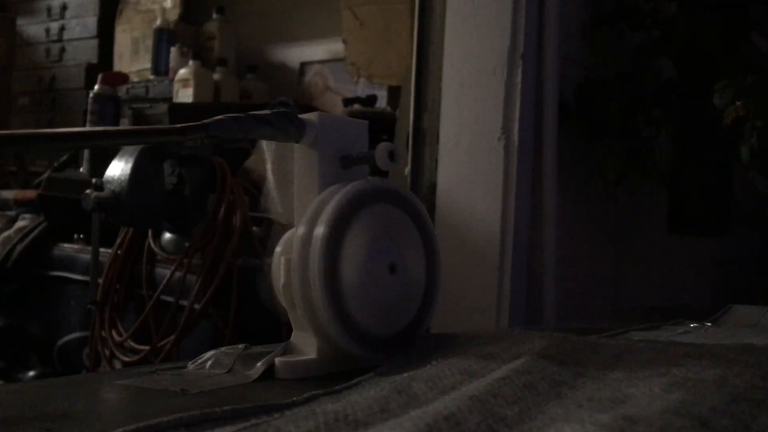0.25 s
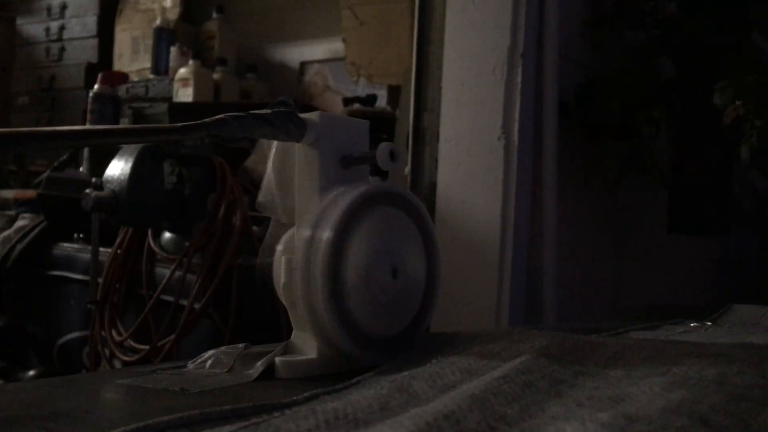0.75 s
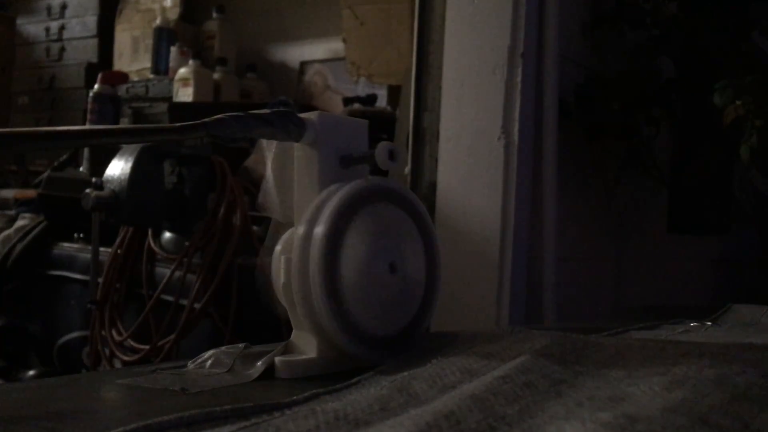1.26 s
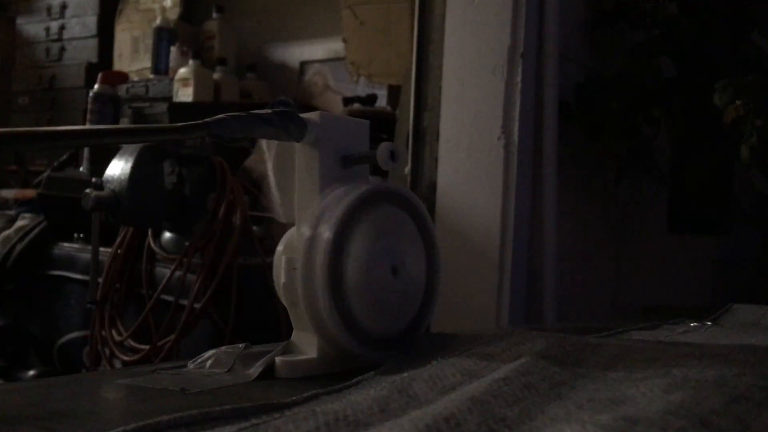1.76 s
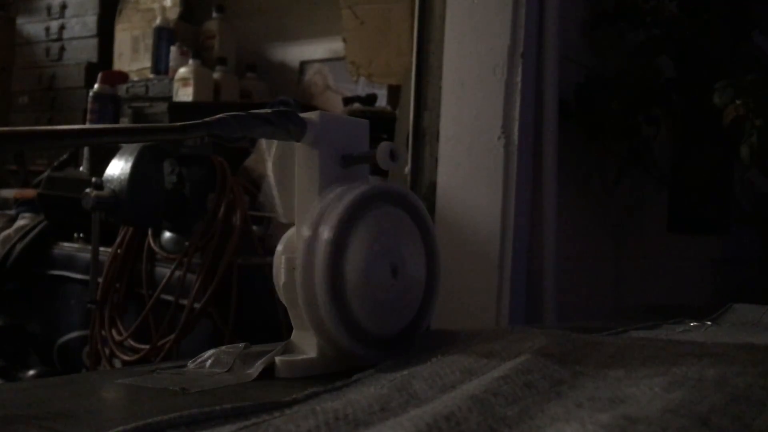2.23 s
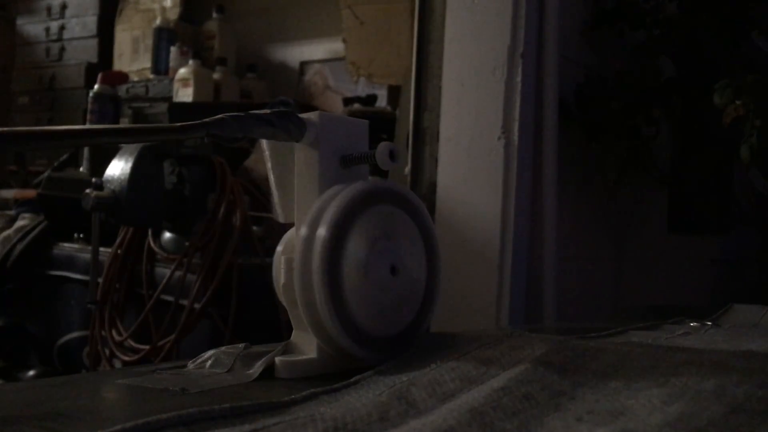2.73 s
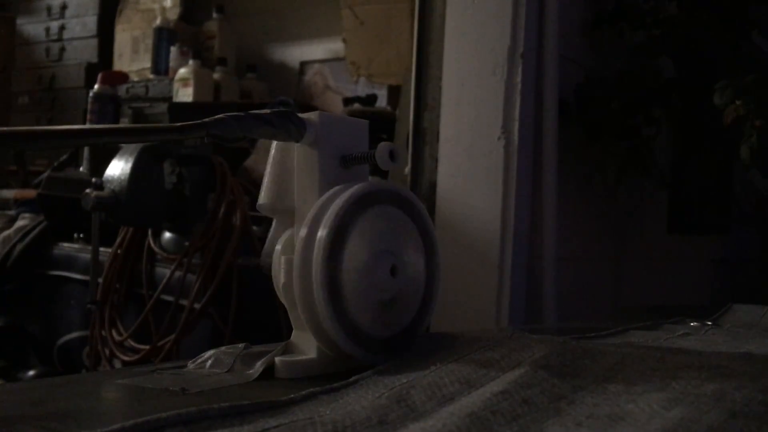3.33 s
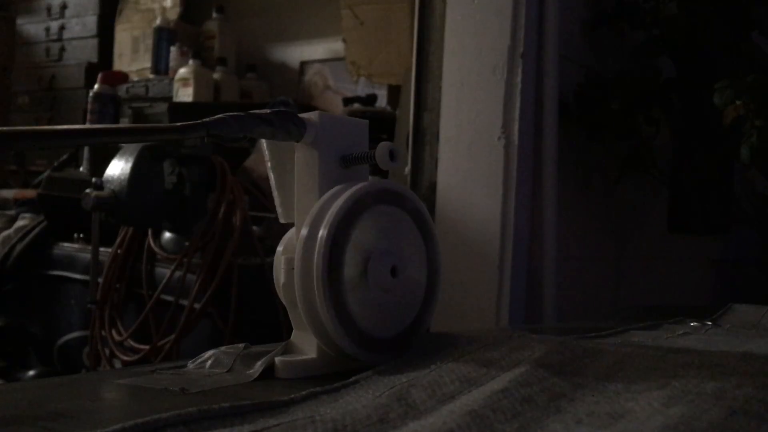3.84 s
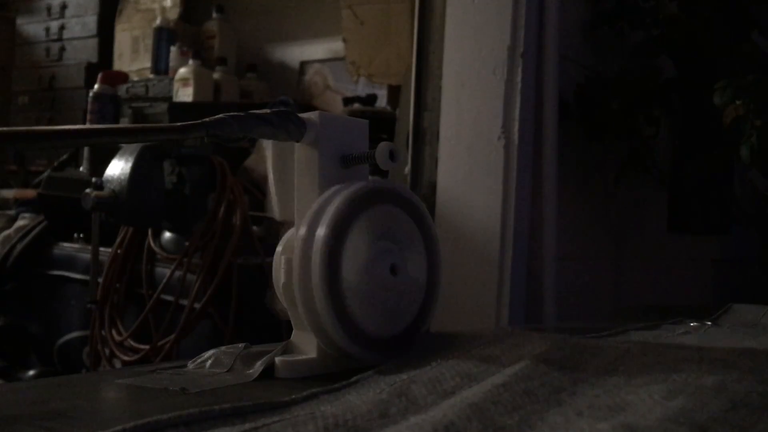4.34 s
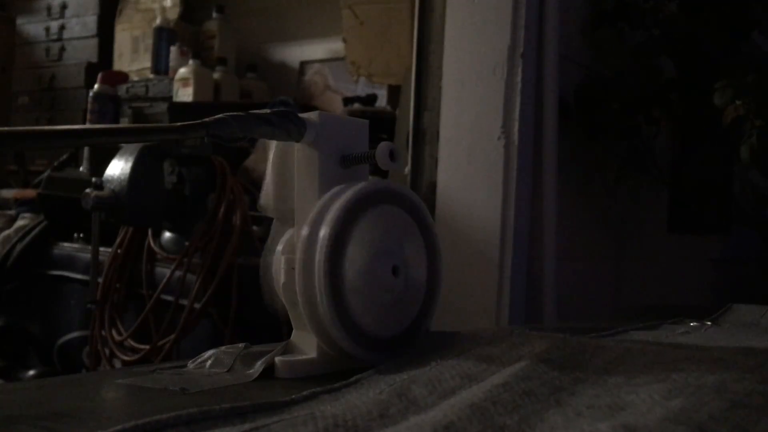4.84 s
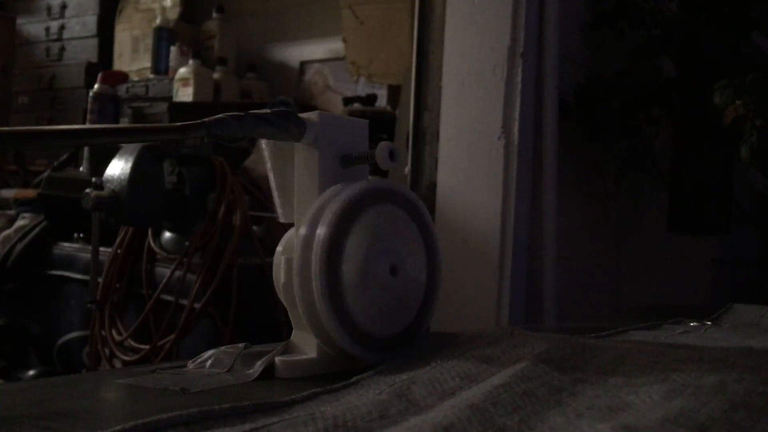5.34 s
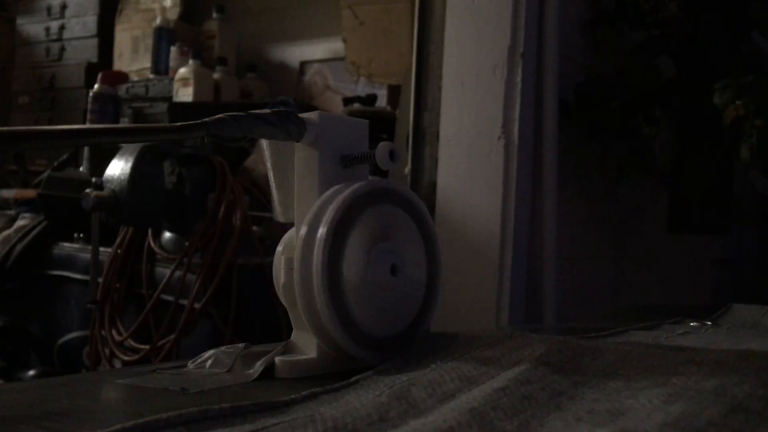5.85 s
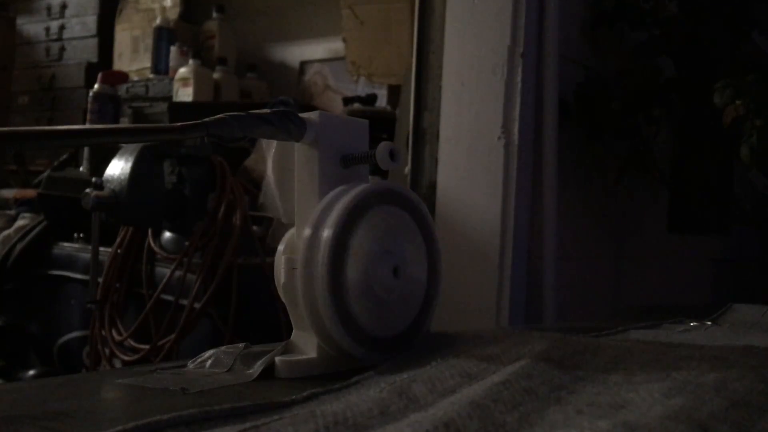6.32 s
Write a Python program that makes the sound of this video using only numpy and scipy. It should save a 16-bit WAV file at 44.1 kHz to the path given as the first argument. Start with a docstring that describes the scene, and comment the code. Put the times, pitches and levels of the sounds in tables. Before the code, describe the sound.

Close by on a workbench, a little air-driven engine puffs fast over the constant hiss of a leak, with faint plastic rubbing and a low boom from the bench. After a couple of seconds the hiss drops and the engine winds down, letting out short squeaky spits. The hiss comes back with strong, separate chuffs and ticking joints, and the pace rises, sags and rises again.

```python
"""A small plastic piston engine runs on compressed air on a workbench.
Every turn lets out a puff of exhaust over the hiss of leaking air and squeezes air past the piston.
Plastic parts rub, and loose joints tick in the frame and knock on the bench, which booms.
The air is throttled and the flywheel coasts down with a few sharp spits; then the valve is opened
again and the engine chuffs on at a slower, wandering pace."""
import sys
import numpy as np
from scipy import signal
from scipy.fft import rfft, irfft
from scipy.io import wavfile
from scipy.ndimage import uniform_filter1d

SR = 44100
rng = np.random.default_rng(int(sys.argv[2]) if len(sys.argv) > 2 else 0)


def int16_out(signal):
    """Quantize to a 16-bit WAV file."""
    q = np.round(np.clip(np.atleast_2d(signal).T, -1, 1) * 32767)
    wavfile.write(sys.argv[1], SR, q.astype(np.int16))


N = 290178
T = np.arange(N) / SR
HZ = np.fft.rfftfreq(N, 1 / SR)

# how fast the flywheel spins: t/s, speed/(turns a second)
FLYWHEEL_SPEED = [(0.0, 20.257), (0.782, 21.137), (2.23, 21.341), (2.48, 20.051), (3.11, 10.274),
                  (3.651, 6.241), (3.938, 6.445), (4.546, 11.972), (4.932, 13.662), (5.502, 12.365),
                  (5.985, 9.942), (6.2, 12.595), (6.58, 16.165)]
# the air supply is throttled, reopened, eased back and opened again: t/s, level/dB
AIR_SUPPLY = [(0, -21.5), (2.3, -22), (2.65, -29), (3.03, -31), (3.2, -23.5), (3.45, -23.3), (3.9, -19),
              (4.3, -20.5), (4.6, -20.5), (5.1, -23), (5.35, -22.5), (5.8, -25), (5.99, -20), (6.58, -21)]
# how the bench's deep boom swells and sinks: t/s, level/dB
BOOM_LEVEL = [(0, -26), (.4, -30), (2.55, -33), (2.95, -30.5), (3.3, -34), (3.8, -36), (4.3, -32.5),
              (4.6, -30.5), (5.4, -31.5), (5.95, -38.5), (6.1, -29), (6.58, -28)]

# tone colours, or how strong each pitch is within one noise: f/Hz, level/dB
LEAK_COLOUR = [(350, -55), (600, -15), (1310, -7.5), (2700, -15.5), (3010, -16), (5560, -11.5), (6290, -6),
               (10300, -3.5), (14100, 2), (15700, 0)]  # leaking air
EXHAUST_COLOUR = [(1500, -47), (2500, -19.5), (3300, -31.5), (4400, -21), (5300, -8), (6900, -1.5),
                  (10700, 1), (14700, -1), (15700, 1)]  # a puff of exhaust
RUB_COLOUR = [(150, -8), (300, -4), (520, -6.5), (800, -8.5), (1400, -4), (1900, -2.5), (2600, -11.5),
              (3500, -15.5), (5000, -13), (9000, -26.5)]  # plastic on plastic
SCRAPE_COLOUR = [(300, -17), (460, 7), (530, -4), (620, -1), (950, 1), (1500, 0.5), (2000, -10),
                 (2700, -26), (5000, -30)]  # the piston at speed
SQUEEZE_COLOUR = [(1500, -21), (3000, -3.5), (4400, -6), (5100, 0), (6000, 8), (9500, 1.5), (10600, 6.5),
                  (12000, -4), (15700, 0)]  # air forced past the piston
RUMBLE_COLOUR = [(20, -55), (45, -16), (65, -9.5), (85, -0.5), (97, -3), (104, 5.5), (116, -7.5),
                 (150, -7.5), (205, -6), (235, -15.5), (305, -12), (400, -14.5), (500, -25), (700, -18),
                 (1000, -41)]  # the bench
TICK_COLOUR = [(200, -28), (500, 3), (1300, 4), (2200, -9), (3300, 4.5), (5000, -11), (9000, 6.5),
               (15000, -31)]  # the frame
CHUFF_COLOUR = [(600, -31), (1500, -19), (2600, -5.5), (3300, -13.5), (4400, -1.5), (5200, -2.5), (7200, 4),
                (9500, -19), (12000, 4), (15700, -4.5)]  # the first blast of a puff

# pitches that the cylinder and its openings boost or weaken: f/Hz, width/Hz, level/dB
PORT_RESONANCES = [(3330, 520, 5.5), (4400, 500, 5), (6850, 650, 2), (7950, 300, 3.5), (9480, 650, 3),
                   (10420, 600, -4), (11600, 700, 1.5)]
# where in each turn the parts slide: angle/turns, length/turns, level/dB
RUB_STROKES = [(.12, 0.11, -0.5), (.3, 0.14, 1), (.49, 0.099, 2), (.67, 0.12, -0.5)]
# where in each turn air slips past the piston: angle/turns, length/turns,
# fast level/dB, slow level/dB, coasting level/dB, whistle f/Hz, whistle level/dB
SQUEEZE_STROKES = [(.1, 0.11, -19.5, -21, -20, 8230, -8), (.265, 0.077, -21.5, -34, -17, 6910, 4),
                   (.485, 0.064, -16.5, -19.5, -33, 8000, -4), (.603, 0.14, -22, -29.5, -18.5, 7960, -1.5),
                   (.72, 0.18, -20, -20.5, -28, 7810, -14), (.965, 0.054, -17.5, -24.5, -21, 7500, -7)]
# where in each turn the loose crank and valve knock: angle/turns,
# fast thump level/dB, slow thump level/dB, fast tick level/dB, slow tick level/dB
JOINT_KNOCKS = [(.003, 4.5, -8.5, 1, 24), (.075, -76, -11, -26, -2), (.29, -3, -6.5, -14, -17),
                (0.429, 1, -10, -11, 7), (0.501, -28, -3.5, -22, 19), (0.576, -4, -9.5, -7, -12),
                (.655, -2, -4.5, -6, -1), (0.777, -4, 0.5, 1, -9), (0.904, -6, -10, -8, -25)]
# notes at which the bench rings with the engine on it: f/Hz, level/dB, time to fade by 60 dB/s
BENCH_NOTES = [(62, -20, 0.048), (100.1, 10, 0.15), (144, -8, 0.19), (192, -27, 0.11), (253, -48, 0.028),
               (459.4, -3.5, 0.062), (602, -2, 0.072), (676, -3, 0.077)]
# spits of air while coasting: t/s, length/s, level/dB, squeak f/Hz, squeak level/dB
COASTING_SPITS = [(2.745, 0.0033, -20.5, 11300, -2), (2.783, 0.0024, -22, 7940, -5),
                  (2.809, 0.0041, -22, 8050, 7), (2.836, 0.003, -27, 6800, -3),
                  (2.851, .0025, -27, 8100, 2), (2.902, 0.0038, -26, 8050, 2),
                  (2.925, 0.0023, -19, 11100, -6), (2.954, 0.0027, -13, 7840, -1),
                  (2.958, 0.0029, -19, 11240, 5), (3.07, 0.007, -20, 6800, -11),
                  (3.116, 0.004, -20, 8000, -3)]

FULL_SPEED, SLOW_SPEED = 21, 13  # turns a second
USUAL_SUPPLY_DB = -24.5


def amp(db):
    """Turn decibels into a number to multiply by."""
    return 10 ** (np.asarray(db) / 20)


def unit(x):
    """Scale a signal to an average strength (rms) of 1."""
    return x / np.sqrt(np.mean(x ** 2) + 1e-20)


def curve(points):
    """Join (time, value) points with straight lines."""
    return np.interp(T, *np.transpose(points))


def shape(points):
    """Join (Hz, dB) points into a gain for every frequency."""
    hz, db = np.transpose(points)
    return amp(np.interp(np.log(HZ + 1), np.log(hz + 1), db))


def muffle(x, hz, steepness):
    """Turn down everything above a frequency."""
    return irfft(rfft(x) / (1 + (HZ / hz) ** steepness), N)


def colour(x, gain):
    """Give a signal a tone colour, at strength 1."""
    return unit(irfft(rfft(x) * gain, N))


def noise(gain):
    """Random noise with the given tone colour."""
    return colour(rng.standard_normal(N), gain)


def flutter(rate_hz, depth_db):
    """A gain that wanders at random, up to about the given rate."""
    return amp(depth_db * noise(1 / (1 + (HZ / rate_hz) ** 4)))


def levelled(x, samples=8000):
    """Even out a signal to strength 1 over a sliding stretch of samples."""
    return x / np.sqrt(abs(uniform_filter1d(x ** 2, samples)) + 1e-9)


def stroke(turns, angle, length):
    """A smooth swell once a turn, centred on a crank angle."""
    return np.exp(-2 * (((turns - angle + .5) % 1 - .5) / length) ** 2)


def crank(start_turns=-.17):
    """The crank's position in turns, and its pace from 0 (slow) to 1 (full speed)."""
    speed = curve(FLYWHEEL_SPEED)
    pace = np.clip((speed - SLOW_SPEED) / (FULL_SPEED - SLOW_SPEED), 0, 1)
    return start_turns + np.cumsum(speed) / SR, pace


def ports():
    """The tone colour that the cylinder and its openings give to any rush of air."""
    return amp(sum(db * np.exp(-2 * ((HZ - hz) / width) ** 2) for hz, width, db in PORT_RESONANCES))


def leak_and_exhaust(turns, pace, supply_db):
    """Air leaks all the time, and puffs out once a turn through the exhaust port."""
    leak = noise(shape(LEAK_COLOUR) * ports()) * amp(0.67) * (1 - 0.074 * stroke(turns, 0.77, 0.15))
    centre, half_open, edge = .175 - 0.018 * pace, .163, .013  # in turns; opens earlier at speed
    from_centre = (turns - centre + .5) % 1 - .5
    opening = .5 + .5 * np.tanh((half_open - abs(from_centre)) / (2 * edge))
    # the rising piston drives the air out harder toward the end of the puff
    puff = noise(shape(EXHAUST_COLOUR) * ports()) * opening * amp(5.5 + 5.7 * from_centre)
    jets = (leak + puff) * flutter(220, .5)
    # higher pressure makes a brighter jet
    dull = muffle(jets, hz=10000, steepness=8)
    extra_db = supply_db - USUAL_SUPPLY_DB
    return (dull * amp(-.3 * extra_db) + (jets - dull) * amp(0.48 * extra_db)) * amp(supply_db)


def sliding(turns, pace, rattle_db, supply_db):
    """Plastic rubs on plastic with each stroke; at a slow pace, air sounds the hollow cylinder."""
    force = 0.3 + sum(amp(db) * stroke(turns, angle, length) for angle, length, db in RUB_STROKES)
    rub = noise(shape(RUB_COLOUR) * ports()) * unit(force * flutter(430, 2.9)) * amp(rattle_db - 2.5)
    # at speed the piston slaps and scrapes the wall as it turns round
    slap = stroke(turns, .032, .044) + .57 * stroke(turns, .483, .17) + .28 * stroke(turns, .96, .042)
    scrape = noise(shape(SCRAPE_COLOUR)) * slap * pace ** 2 * amp(-31)
    hollow = noise(1 / (1 + ((HZ - 3330) / 190) ** 4))
    return rub + scrape + hollow * unit(force) * (1 - pace) * amp(supply_db - 23.5)


def whistling(hz, db):
    """Air rushes through a narrow gap: a hiss with a whistle in it."""
    hiss = noise(shape(SQUEEZE_COLOUR) * ports())
    return hiss + amp(db) * noise(1 / (1 + ((HZ - hz) / 130) ** 2))


def squeezing(turns, pace, supply_db):
    """The piston pumps air through its own gaps in bursts, whose levels shift as it slows or coasts."""
    coasting = np.clip((-27.5 - supply_db) / 6, 0, 1)
    bursts = np.zeros(N)
    for angle, length, fast_db, slow_db, coast_db, whistle_hz, whistle_db in SQUEEZE_STROKES:
        driven_db = slow_db + pace * (fast_db - slow_db)
        burst_db = driven_db + coasting * (coast_db - driven_db)
        bursts += whistling(whistle_hz, whistle_db) * stroke(turns, angle, length) * amp(burst_db)
    return bursts * flutter(150, 2.44) * amp(-5.5)


def droning(pace):
    """The bench rumbles and hums near its strongest note, most of all when the engine is slow."""
    hz = 103 + 3.47 * noise(1 / (1 + (HZ / 7) ** 4))
    hum = np.sqrt(2) * np.sin(2 * np.pi * np.cumsum(hz) / SR) * flutter(14, 1.5)
    return hum * amp(-1 - 17 * pace ** 2) + noise(shape(RUMBLE_COLOUR)) * amp(-2 - 6 * pace ** 2)


def rocking(turns, pace):
    """The piston's weight, thrown to and fro, rocks the bench twice a turn."""
    return -np.cos(4 * np.pi * turns) * pace ** 2 * amp(-49)


def knocking(turns, pace):
    """Loose joints knock near set crank angles: one spike for each thump and each tick."""
    thumps, ticks = np.zeros(N), np.zeros(N)
    whole_turns = np.arange(int(turns[-1]) + 1)
    for angle, thump_fast_db, thump_slow_db, tick_fast_db, tick_slow_db in JOINT_KNOCKS:
        slip, weight, snap = rng.standard_normal((len(whole_turns), 3)).T
        fast = np.interp(whole_turns + angle, turns, pace)
        # slow turns knock later and less evenly
        late = .02 * (1 - fast) + slip * (.012 - .009 * fast)
        thump_db = thump_slow_db + fast * (thump_fast_db - thump_slow_db) + weight * (3.2 - 2.4 * fast)
        tick_db = tick_slow_db + fast * (tick_fast_db - tick_slow_db) + 3.4 * snap
        at = np.searchsorted(turns, whole_turns + angle + late)
        heard = (at > 0) & (at < N)
        thumps[at[heard]] += amp(thump_db)[heard]
        ticks[at[heard]] += amp(tick_db)[heard]
    return thumps, ticks


def booming(thumps, pace):
    """Each thump rings the bench over its drone; the deep boom swells and sinks, the higher notes less."""
    t = T[:SR // 4]
    ring = -sum(amp(db - 60 * t / fade_s) * np.cos(2 * np.pi * hz * t) for hz, db, fade_s in BENCH_NOTES)
    low_band = 1 / (1 + (HZ / 900) ** 4) / (1 + (44 / (HZ + 1)) ** 10)
    ringing = colour(signal.fftconvolve(thumps, ring)[:N], low_band)
    # the hard knocks of fast running bring out the higher notes
    soft = muffle(ringing, hz=420, steepness=6)
    ringing = soft + (ringing - soft) * amp(-7 + 7.9 * pace ** 2)
    bench = levelled(ringing) * amp(-4 + 2.8 * pace ** 2) + droning(pace)
    boom = muffle(bench, hz=135, steepness=12)
    boom_db = curve(BOOM_LEVEL)
    upper_db = -37.5 + 2 * pace + 0.42 * (boom_db - boom_db.mean())
    return levelled(boom, 6000) * amp(boom_db - 1) + levelled(bench - boom, 16000) * amp(upper_db)


def clattering(ticks, rattle_db):
    """Each tick in the frame is a sharp crack of noise with a faint tail."""
    t = T[:SR // 4]
    crack = (amp(-60 * t / 0.013) + amp(-22 - 60 * t / 0.1)) * (t > .0007)
    cracks = signal.fftconvolve(ticks, crack)[:N] * rng.standard_normal(N)
    return colour(cracks, shape(TICK_COLOUR)) * amp(rattle_db - 9)


def chuffing(turns, pace, supply_db, settle_s=0.17):
    """Trapped air bursts out as each puff starts, hardest when slow and just after the valve opens."""
    keep = np.exp(-1 / (settle_s * SR))
    # a rise in the supply sends a short surge into the cylinder
    surge_db = np.maximum(signal.lfilter([1, -1], [1, -keep], supply_db - supply_db[0]), 0)
    chuff_db = -23 - 18 * pace + 1.1 * surge_db  # slow turns fill the cylinder best
    opened = (turns - .02) % 1
    burst = (1 - np.exp(-opened / 0.033)) * np.exp(-opened / 0.11) * 2
    return noise(shape(CHUFF_COLOUR) * ports()) * burst * flutter(300, 1.4) * amp(chuff_db)


def spitting():
    """The cylinder lets out sharp, squeaky spits of air as the flywheel coasts down."""
    return sum(whistling(squeak_hz, squeak_db) * np.exp(-2 * ((T - at_s) / length_s) ** 2) * amp(db)
               for at_s, length_s, db, squeak_hz, squeak_db in COASTING_SPITS)


def workshop(x, fade_s=0.1, echo_db=-14):
    """Add dense, short echoes from the bench and shelves."""
    t = T[:SR // 3]
    tail = rng.standard_normal(len(t)) * amp(-60 * t / fade_s) * (t > .003)
    return x + amp(echo_db) * signal.fftconvolve(x, tail / np.linalg.norm(tail))[:N]


def scene():
    """The crank sets the engine's rhythm; air supply and pace shape the strength of its sounds."""
    turns, pace = crank()
    supply_db = curve(AIR_SUPPLY)
    # the moving parts rattle harder under pressure
    rattle_db = -35 - 1.5 * pace + 0.38 * (supply_db - USUAL_SUPPLY_DB)
    hiss = leak_and_exhaust(turns, pace, supply_db) + chuffing(turns, pace, supply_db)
    hiss += squeezing(turns, pace, supply_db) + spitting()
    hiss = workshop(hiss + sliding(turns, pace, rattle_db, supply_db))
    thumps, ticks = knocking(turns, pace)
    return (hiss + clattering(ticks, rattle_db) + booming(thumps, pace) + rocking(turns, pace))[None]


def record(dry):
    """Cut off the very highest treble, above 15850 Hz."""
    treble_cut = signal.firwin(601, 15850, window=("kaiser", 9), fs=SR)
    return signal.oaconvolve(dry, treble_cut[None], "same")


dry = scene()
out = record(dry)
int16_out(out)
```